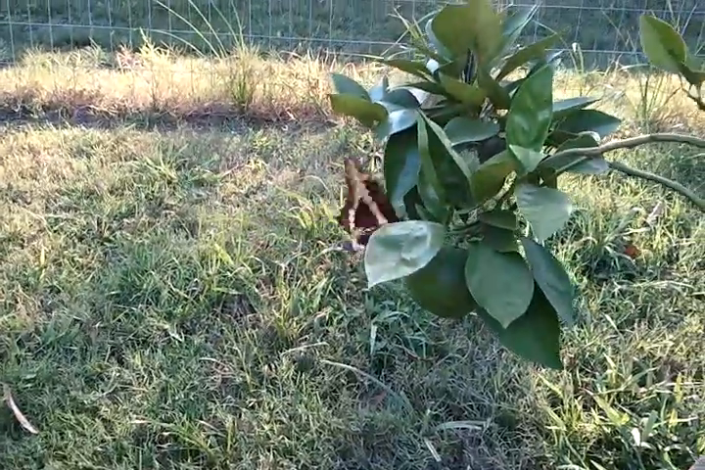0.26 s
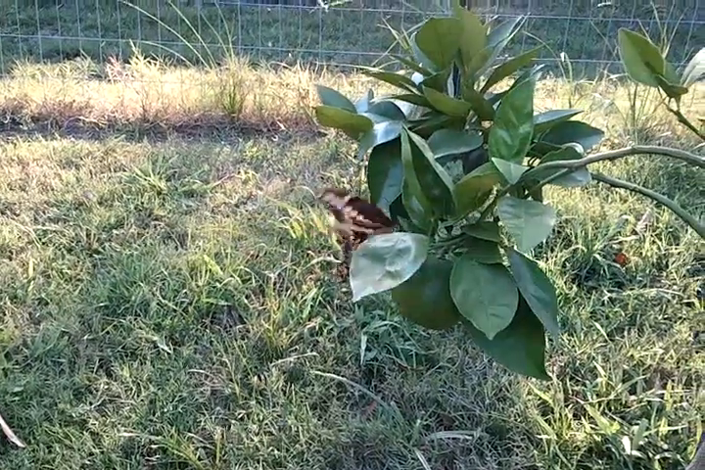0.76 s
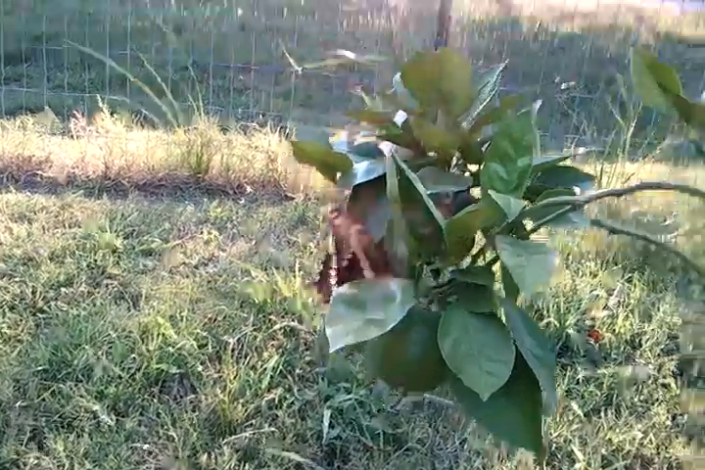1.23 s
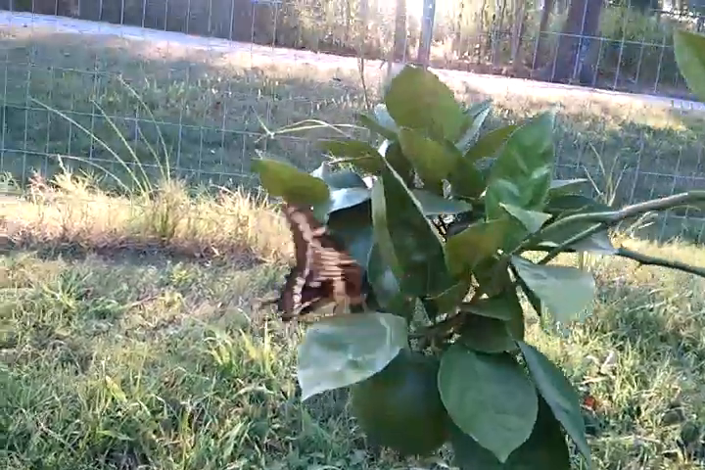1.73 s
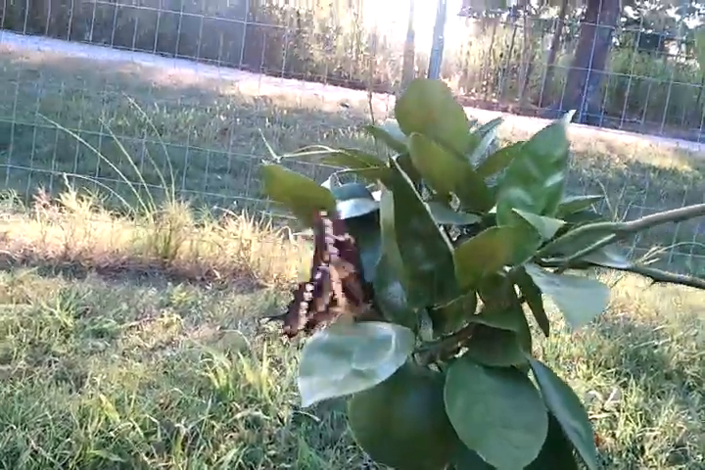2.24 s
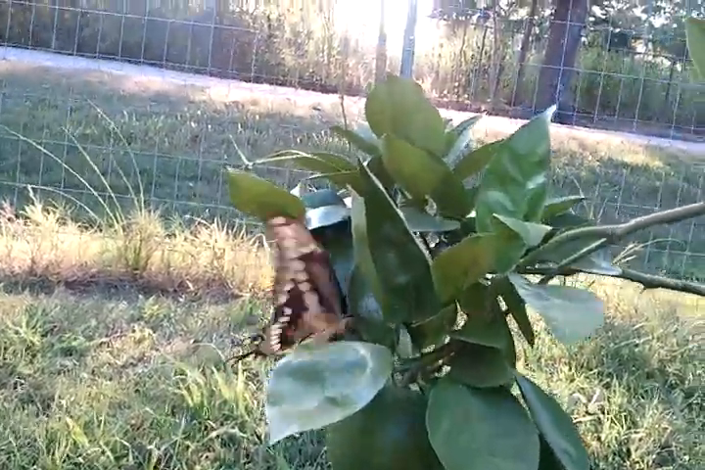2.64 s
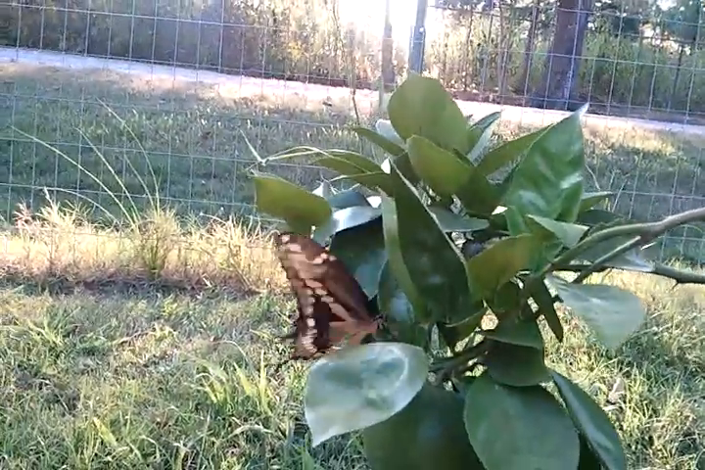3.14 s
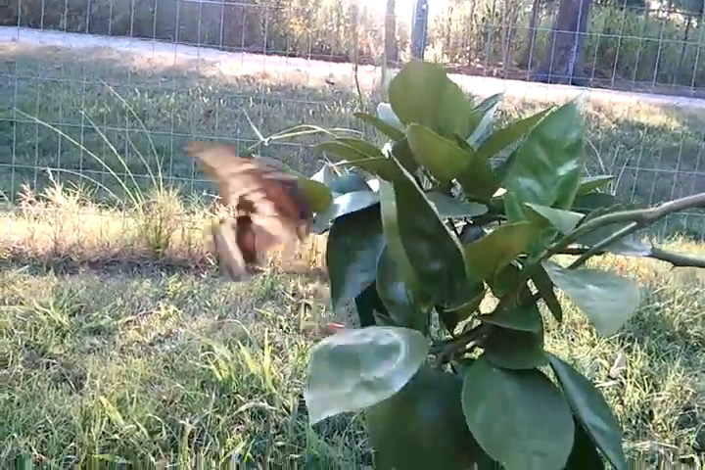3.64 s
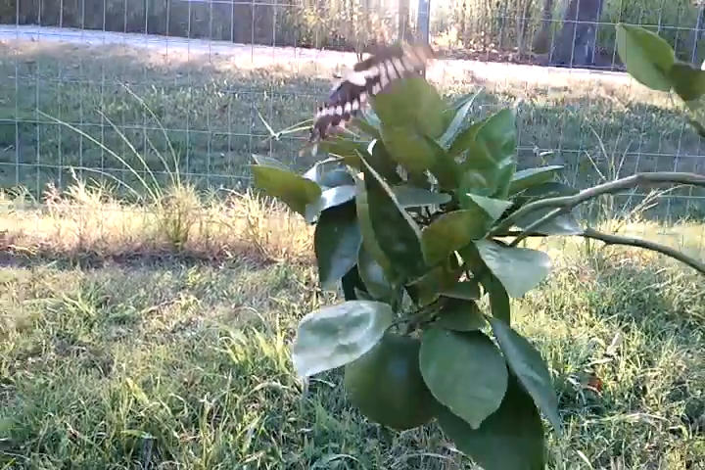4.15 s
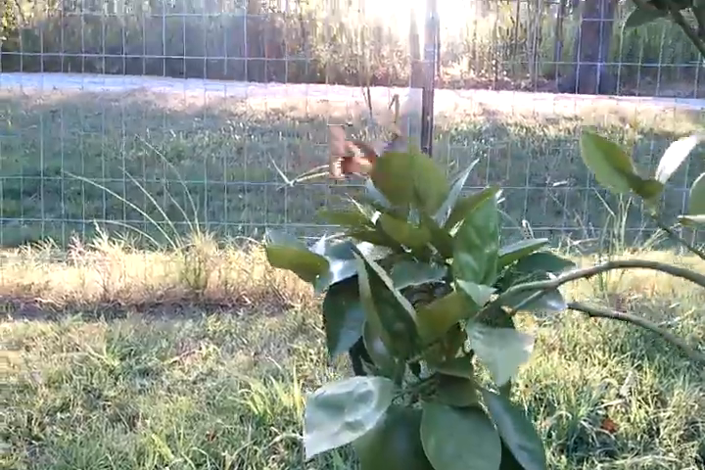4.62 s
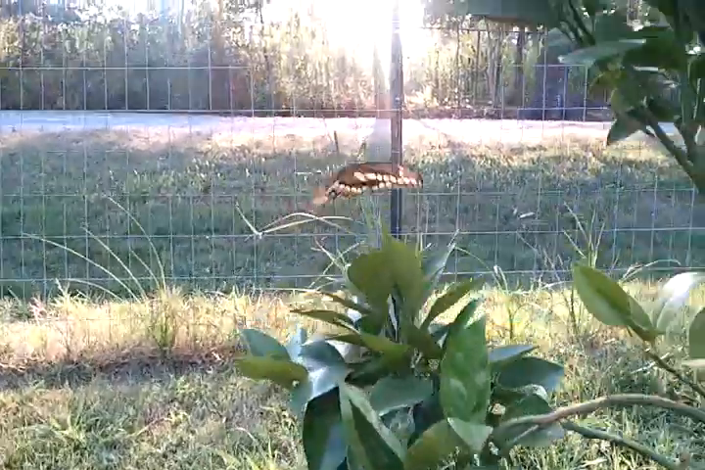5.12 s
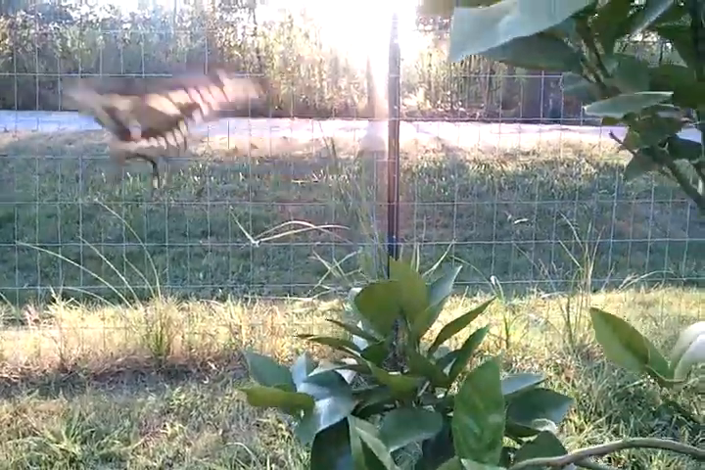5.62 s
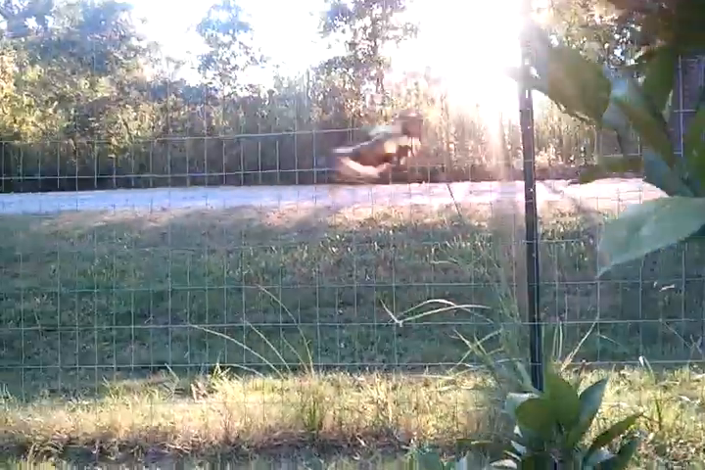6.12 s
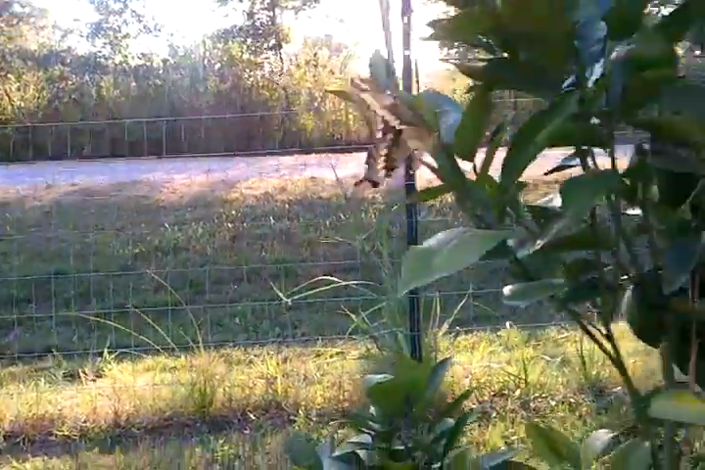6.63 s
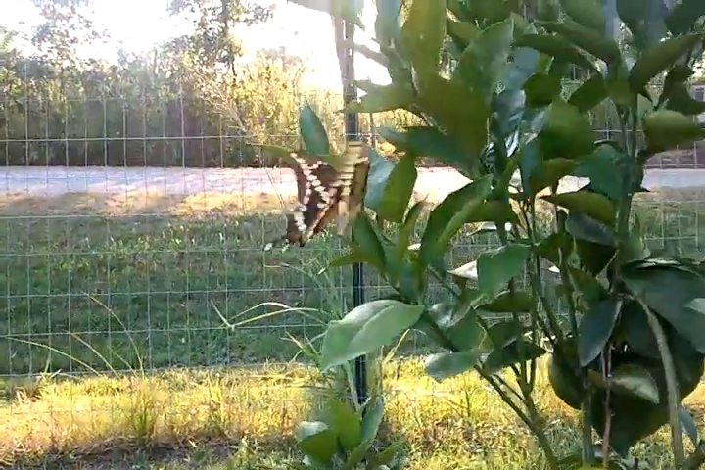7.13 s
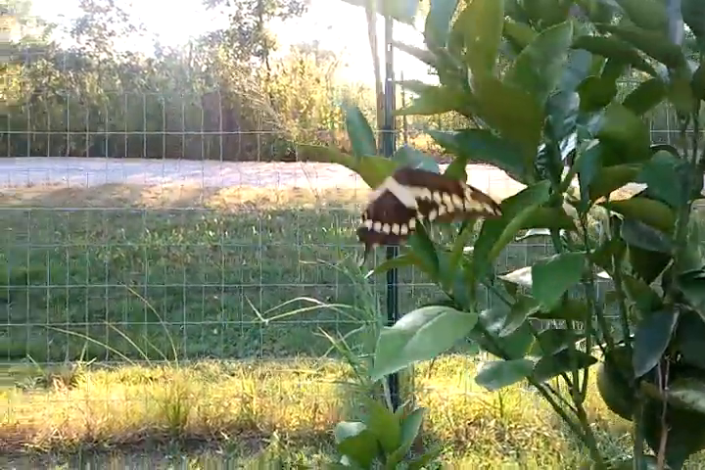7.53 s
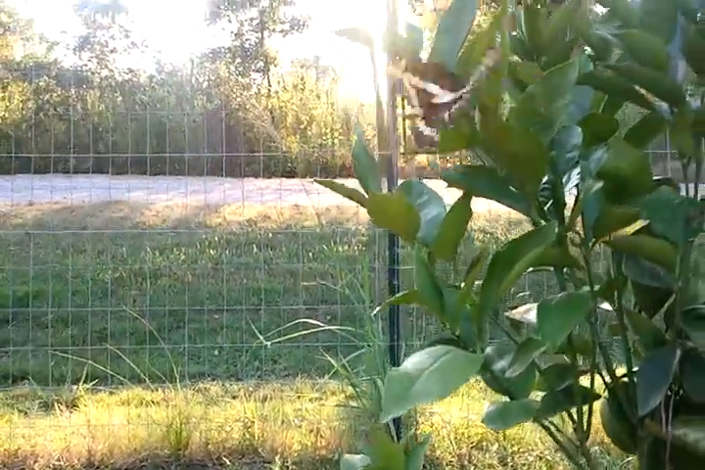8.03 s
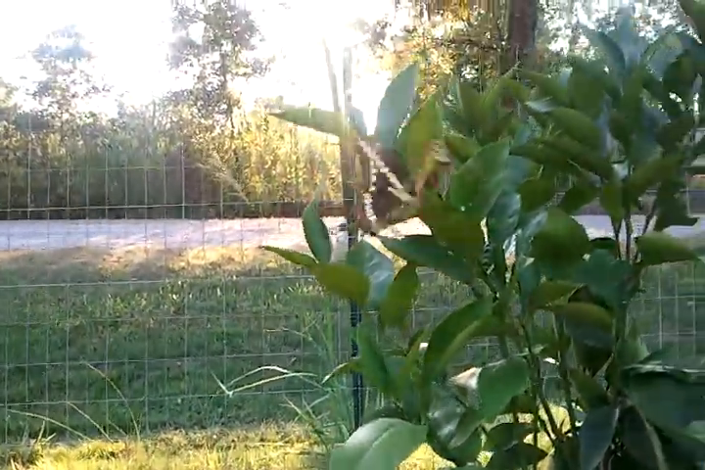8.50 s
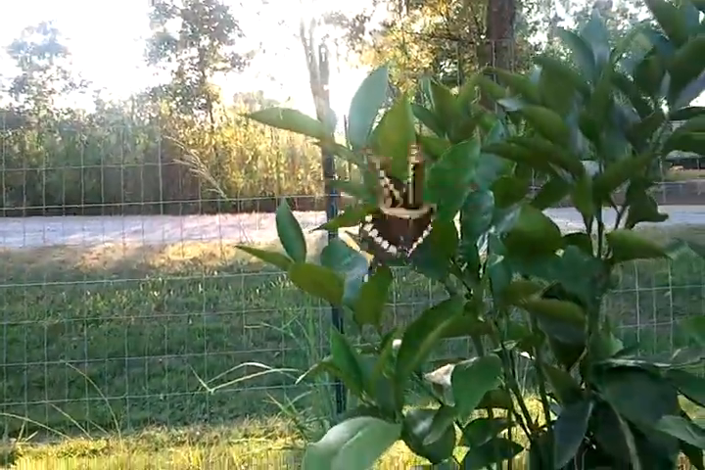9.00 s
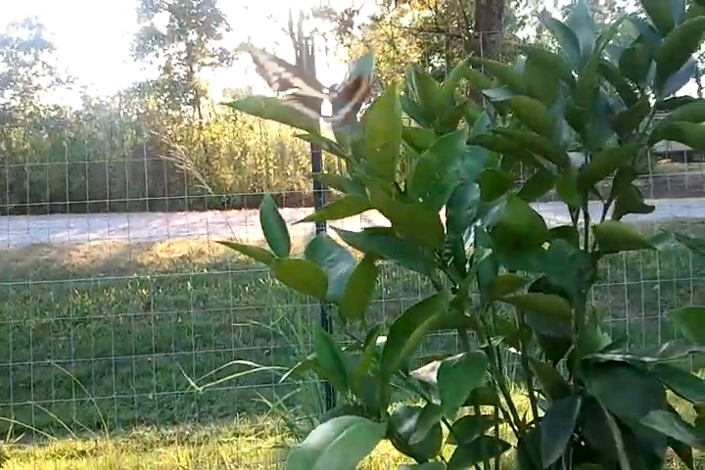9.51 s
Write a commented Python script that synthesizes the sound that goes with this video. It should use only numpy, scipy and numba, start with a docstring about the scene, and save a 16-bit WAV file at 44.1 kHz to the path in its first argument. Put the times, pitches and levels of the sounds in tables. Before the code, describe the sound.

Bright, grainy insect drone fills an open yard, picked up by a simple hand-held microphone. It grows from a thin hiss into a dense, piercing buzz, pulsing briefly with quick tiny gaps, while a muffled vehicle passes far away. After a slight lull the singing builds again with a fresh close buzzer, continuing without stopping. Soft machine hum and distant road hiss lie beneath.

```python
"""Cicadas sing in the trees round a grassy yard on a summer evening, heard by a small hand-held camera.
Low machine hum and far traffic last throughout. A far chorus, noise in slices of pitch, swells over the first
seconds as one near male and then a second join; brief regular dips cut their singing and an engine throbs past.
A third male starts after six seconds and sings on to the end. Each near male is a train of tymbal strokes:
every stroke buckles a row of ribs, whose clicks ring the hollow abdomen, and leaves scatter the sound."""
import sys
import numpy as np
from scipy import signal
from scipy.fft import rfft, irfft
from scipy.io import wavfile
from scipy.ndimage import uniform_filter1d
from numba import njit

SR = 44100
rng = np.random.default_rng(int(sys.argv[2]) if len(sys.argv) > 2 else 0)


def dump(signal):
    """Clip the signal to [-1, 1] and save it as 16-bit WAV at the path in sys.argv[1]."""
    limited = np.clip(np.atleast_2d(signal).T, -1, 1)
    pcm = np.round(limited * 32767).astype(np.int16)
    wavfile.write(sys.argv[1], SR, pcm)


N = 430416

# Drones of the machine. Each row: centre in Hz, width of each band in Hz, level in dB before the slow fade.
HUM_DRONES = [(58.3, 5, -58), (121, 13, -59.5), (163.6, 18, -63.5), (237.8, 11, -67.5), (923, 6, -81)]
TONE_HZ, TONE_DB = 221.7, -66.5  # mean pitch and level of the steadier tone
HUM_FADE_DB = 1.5  # total fall

# Levels of the far road. Each row: time in seconds, mean rumble in dB, mean tyre hiss in dB.
ROAD_LEVELS = [(0, -56, -59), (1.5, -54.5, -59), (2.5, -54, -60), (4.3, -54.5, -59.5), (6.0, -55.5, -57.5),
               (7.5, -56, -57), (9.76, -57.5, -57)]
# Spectrum of the engine rumble. Each row: frequency in Hz, relative density in dB per Hz.
RUMBLE_SPECTRUM = [(12, -29.5), (20, -17), (25, -19), (32, -21.5), (118, -24.5), (192, -35), (228, -35.5),
                   (270, -33.5), (600, -45), (780, -80.5), (1320, -120)]
# Spectrum of the tyre hiss. Each row: frequency in Hz, relative density in dB per Hz.
HISS_SPECTRUM = [(210, -21.5), (350, -6.5), (541, -6.5), (942, -2.5), (1970, -6), (2350, -14), (2600, -15),
                 (3380, -33), (5720, -120)]
# The heavier engine: time of its peak, level there, fall in dB per s squared, pitch there, climb in Hz per s.
ENGINE_S, ENGINE_DB, ENGINE_FADE_DB, ENGINE_HZ, ENGINE_CLIMB_HZ = 2.68, -52, 28.5, 74.6, 6

# Course of the far chorus. Each row: time in seconds, level in dB before its share, brightness in dB per octave.
CHORUS_COURSE = [(0.0, -42, -3.5), (0.57, -38.5, -3.5), (1.22, -33.5, -2.5), (1.55, -33, -1.5),
                 (1.95, -31, 2), (2.47, -30.5, 2), (3.97, -33, 1), (5.38, -29, 0.5), (6.25, -30, 1.5),
                 (6.96, -27.5, 2), (9.43, -28, 0.5), (9.76, -28.5, 0.5)]
CHORUS_SHARE_DB = -4.5
# Spectrum of the chorus before brightening. Each row: frequency in Hz, relative density in dB per Hz.
CHORUS_SPECTRUM = [(1180, -51.5), (2000, -32), (2240, -24), (2440, -23.5), (2630, -16.5), (2930, -9),
                   (3240, -7.5), (3340, -6.5), (3810, -1.5), (4340, -3), (5010, -1.5), (5680, -5),
                   (7290, -12), (8900, -33), (11600, -69), (19600, -120)]

# Clearest narrow bands that stand out or drop away. Each row: start in seconds, length in seconds,
# starting centre in Hz, glide in Hz per second, width in Hz, greatest change in dB.
CLEAR_STRANDS = [(.2, 1.3, 4660, 10, 140, -9), (.9, .6, 4460, -20, 45, 12), (.1, .9, 4450, 0, 70, 5),
                 (1.1, .9, 5220, 300, 110, 5), (.9, .55, 3600, -20, 70, 6), (1.3, .45, 5050, 150, 80, 5),
                 (1.6, .9, 4420, 150, 90, 4), (3.6, 1.5, 6660, -40, 100, 2), (4.2, .9, 6150, 0, 120, -7),
                 (5.3, 2.4, 3120, 0, 80, 5), (.3, 1.3, 3000, 30, 120, 4), (6.4, 2, 4090, -40, 80, 6),
                 (6.6, .6, 5050, 400, 110, 5), (6.9, .8, 5500, -50, 90, 3), (7.0, 3.4, 3400, 0, 60, -6),
                 (7.2, 3.2, 4820, 0, 300, -5), (7.3, 1.4, 5430, -130, 100, 6),
                 (8.3, 1.9, 5540, -100, 100, 6), (8.4, 1.8, 6120, 0, 90, 4), (8.5, 1.7, 5150, -15, 110, 5),
                 (8.7, 1.5, 4090, 0, 70, 5)]
# Fainter strands placed by chance: count, mean length, greatest glide per s, width, change, range of centres.
FAINT_COUNT, FAINT_S, FAINT_GLIDE_HZ, FAINT_WIDTH_HZ = 24, 1.1, 40, 81
FAINT_DB, FAINT_BAND_HZ = 1.5, (2800, 6800)
# Regular dips: centre of one dip, spacing, half length; depth limit, time of greatest depth, spread either side.
CATCH_S, CATCH_EVERY_S, CATCH_HALF_S = .976, .1635, .009
CATCH_DB, CATCH_DEEPEST_S, CATCH_SPREAD_S = -6.5, 1.36, .42

# Resonances of each abdomen. Each row: centre in Hz before tuning, nominal width in Hz before the
# two passes scale it, relative gain in dB.
FIRST_ABDOMEN = [(2990, 230, -14), (3680, 440, -5.5), (4350, 290, -12.5), (5340, 480, 3), (6100, 1400, -19),
                 (6770, 300, -6)]
SECOND_ABDOMEN = [(3030, 474, -3), (3963, 430, 4.5), (5150, 600, 0), (5560, 500, -13), (6660, 380, 0.5),
                  (7920, 500, -13)]
THIRD_ABDOMEN = [(2920, 160, -16.5), (3743, 140, -16), (4050, 260, 5.5), (4490, 130, -20.5),
                 (5040, 160, -13.5), (5387, 510, 10), (5750, 310, -10), (6900, 200, -21)]
# Songs of the near males. Each row: start in seconds, swell in seconds, hold in seconds, fade in seconds,
# strokes per second at full effort before tiring, share of strokes lost at no effort, level in dB at the start
# before effort scales it, growth in dB per second, share by which the tuning sags at no effort.
NEAR_SONGS = [(.4, 2.3, .3, 1.7, 232, .11, -36.5, 0, .11), (1.2, 3.2, 1.9, 1.4, 189, 0, -39, 0, .03),
              (6.1, 1.2, 3, 1, 213, 0, -39, 1, .08)]
TIRING_PER_S2 = 1.1  # strokes per s lost in each second of song
# Tuning factor at full effort; powers of effort for gain and of slackness for sag.
FULL_TUNING, LOUDNESS_POWER, SAG_POWER = 1.0095, 0.73, 2.5

OFFSET, TOP_HZ = -.062, 9130  # converter's constant offset in full scale; edge of its steep low-pass


def undb(db):
    """Logarithmic level: amplitude gain is ten to the power dB / 20."""
    return 10 ** (np.asarray(db) / 20)


def unit(x):
    """Power normalisation: scale to rms 1."""
    return x / np.sqrt(np.mean(x ** 2))


def curves(table):
    """Linear interpolation: columns against time become sample-rate curves."""
    s, *columns = np.transpose(table)
    return [np.interp(np.arange(N) / SR, s, c) for c in columns]


@njit
def svf(x, hz, width):
    """Resonance: a state-variable band-pass with a movable centre, gain 1 there."""
    y, band, low = np.empty(len(x)), 0., 0.
    for i in range(len(x)):
        g, k = np.tan(np.pi * hz[i] / SR), width / hz[i]
        v = (band + g * (x[i] - low)) / (1 + g * (g + k))
        band, low, y[i] = 2 * v - band, low + 2 * g * v, k * v
    return y


def walk(rate):
    """Slow random modulation: levels held 1 / rate s, smoothed twice, spread near 1."""
    hold = int(SR / rate)
    steps = np.repeat(rng.standard_normal(N // hold + 1), hold)
    return 1.25 * uniform_filter1d(uniform_filter1d(steps, hold), hold)[:N]


def coloured(points):
    """Spectral shaping: white noise weighted by (Hz, dB) points, at rms 1."""
    hz, db = np.transpose(points)
    bins = np.arange(1, N // 2 + 2) * SR / N
    weight = undb(np.interp(np.log(bins), np.log(hz), db, -200, -200))
    return unit(irfft(rfft(rng.standard_normal(N)) * weight, N))


def leaves(x, t60, wet_db):
    """Diffuse scattering: direct sound plus short decaying tails, two mixed in turn as the camera turns."""
    t = np.arange(SR // 8) / SR
    # amplitude falls 60 dB in t60 seconds
    tails = rng.standard_normal((2, len(t))) * np.exp(-np.log(1000) * t / t60)
    a, b = (signal.oaconvolve(x, tail / np.sqrt(np.sum(tail ** 2)))[:N] for tail in tails)
    turn = np.cumsum(2.39 + 1.44 * walk(1.213)) / SR  # radians
    scattered = a * np.cos(turn) + b * np.sin(turn)
    return (x + undb(wet_db) * scattered) / np.sqrt(1 + undb(2 * wet_db))


def hum():
    """Narrow-band noise and a wavering sine: low drones and one steadier machine tone, sinking slowly."""
    drones = 0
    for hz, width, db in HUM_DRONES:
        drone = svf(rng.standard_normal(N), np.full(N, 1. * hz), 1. * width)
        drones = drones + undb(db) * unit(drone)
    phase = 2 * np.pi * np.cumsum(TONE_HZ + 1.2 * walk(6)) / SR
    tone = np.sqrt(2) * undb(TONE_DB + 2.9 * walk(4)) * np.sin(phase)
    fade = undb(np.linspace(HUM_FADE_DB / 2, -HUM_FADE_DB / 2, N))
    return fade * (drones + tone)


def traffic():
    """Superposed noise bands: far rumble and tyre hiss, plus the resonant throb of a passing engine."""
    rumble_db, hiss_db = curves(ROAD_LEVELS)
    t = np.arange(N) / SR - ENGINE_S
    engine_hz = ENGINE_HZ + ENGINE_CLIMB_HZ * np.clip(t, -1, 1)
    throb = svf(svf(rng.standard_normal(N), engine_hz, 45.), engine_hz, 45.)
    engine = unit(throb) * undb(ENGINE_DB - ENGINE_FADE_DB * t ** 2)
    rumble = coloured(RUMBLE_SPECTRUM) * undb(rumble_db + 1.2 * walk(4.1))
    hiss = coloured(HISS_SPECTRUM) * undb(hiss_db + .6 * walk(7.3))
    return rumble + hiss + engine


def chorus():
    """Incoherent addition: countless males blur into a hiss whose slices of pitch swell independently."""
    db, bright = curves(CHORUS_COURSE)
    spectrum, out = rfft(coloured(CHORUS_SPECTRUM)), 0
    octave = np.log2(np.arange(1, N // 2 + 2) * SR / N / 4500)  # octaves from 4500 Hz
    for centre in np.arange(-1.35, 1.1, .15):
        # neighbouring triangles overlap and add up to 1
        share = np.clip(1 - np.abs(octave - centre) / .15, 0, 1)
        out = out + irfft(spectrum * share, N) * undb(bright * centre + 0.4 * walk(1.4))
    return leaves(out * undb(db + CHORUS_SHARE_DB), t60=.12, wet_db=-7)


def strands(x):
    """Time-varying equalisation: narrow gliding bands rise or sink, each fading in and out."""
    when, long, pitch, glide, lift = rng.random((FAINT_COUNT, 5)).T
    low, high = FAINT_BAND_HZ
    faint = zip(
        when * (N / SR - FAINT_S),
        FAINT_S * (.5 + long),
        low + (high - low) * pitch,
        FAINT_GLIDE_HZ * (2 * glide - 1),
        np.full(FAINT_COUNT, FAINT_WIDTH_HZ),
        FAINT_DB * np.sign(lift - .3))  # more rise than sink
    out = x.copy()
    for start, length, start_hz, glide_hz, width, db in [*CLEAR_STRANDS, *faint]:
        span = slice(int(start * SR), int((start + length) * SR))
        part = x[span]
        band = svf(part, start_hz + glide_hz * np.arange(len(part)) / SR, 1. * width)
        fade = signal.windows.tukey(int(length * SR) + 2, .4)[:len(part)]
        out[span] += (undb(db) - 1) * fade * band
    return out


def catches():
    """Periodic amplitude modulation: gain of short dips at a steady beat, deepening and then dying away."""
    t = np.arange(N) / SR
    off = (t - CATCH_S + CATCH_EVERY_S / 2) % CATCH_EVERY_S - CATCH_EVERY_S / 2
    dip = np.cos(np.pi / 2 * np.clip(off / CATCH_HALF_S, -1, 1)) ** 2
    depth = np.exp(-((t - CATCH_DEEPEST_S) / CATCH_SPREAD_S) ** 2)
    return undb(CATCH_DB * dip * depth)


def song(start, swell, hold, fade, rate, lost, db, growth_db, sag):
    """Common control: muscular effort sets loudness, stroke rate and the tension of the abdomen."""
    t = np.arange(N) / SR - start
    ramp = np.minimum(t / swell, (swell + hold + fade - t) / fade)
    effort = np.sin(np.pi / 2 * np.clip(ramp, 0, 1)) ** 2
    strokes = (rate - TIRING_PER_S2 * np.clip(t, 0, None)) * (1 - lost * (1 - effort))
    gain = undb(db + growth_db * t) * effort ** LOUDNESS_POWER
    tuning = FULL_TUNING - sag * (1 - effort) ** SAG_POWER
    return strokes, gain, tuning


def cicada(row, body, burst, t60, wet_db):
    """Forced resonance: each stroke is a fading burst of rib clicks of random sign that rings the abdomen."""
    rate, gain, tuning = song(*row)
    phase = np.cumsum(rate * (1 + 0.004 * walk(30))) / SR % 1  # fraction of a stroke
    envelope = (1 - np.exp(-phase / 0.03)) * np.exp(-phase / burst)
    ribs = np.sign(rng.standard_normal(N)) * envelope
    on = gain > 0
    ring = np.zeros(N)
    for k, (hz, width, mode_db) in enumerate(body):
        # each resonance is applied twice, which keeps the band edges steep
        once = svf(ribs[on], hz * tuning[on], 1.2 * width)
        twice = svf(once, hz * tuning[on], 1.76 * width)
        ring[on] += (-1) ** k * undb(mode_db) * twice  # adjacent modes in opposite phase
    ring *= gain / np.sqrt(np.mean(ring[on] ** 2))
    return leaves(ring, t60, wet_db)


def scene():
    """Linear superposition: all sources add at the single microphone."""
    bodies = FIRST_ABDOMEN, SECOND_ABDOMEN, THIRD_ABDOMEN
    near = sum(cicada(row, body, burst=.45, t60=.1, wet_db=-8) for row, body in zip(NEAR_SONGS, bodies))
    singing = strands(near + chorus()) * catches()
    return (singing + traffic() + hum())[None]


def record(dry):
    """Band limiting: the camera's converter sits off centre and rolls off the top."""
    soft = signal.sosfilt(signal.butter(14, 8500, fs=SR, output="sos"), dry)
    return signal.sosfilt(signal.ellip(13, .2, 60, TOP_HZ, fs=SR, output="sos"), soft + OFFSET)


dry = scene()
out = record(dry)
dump(out)
```